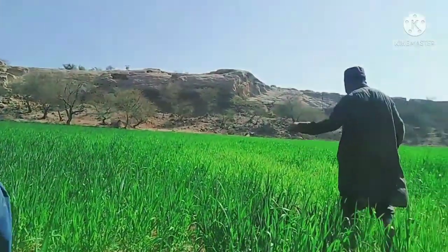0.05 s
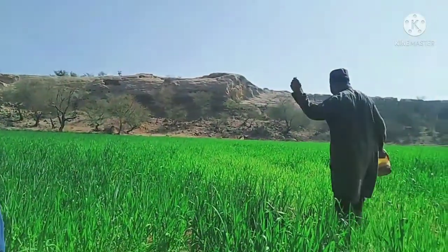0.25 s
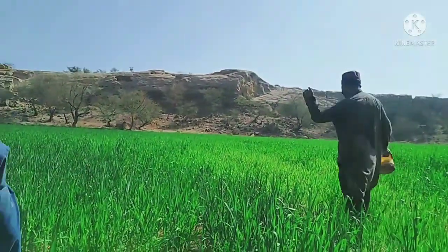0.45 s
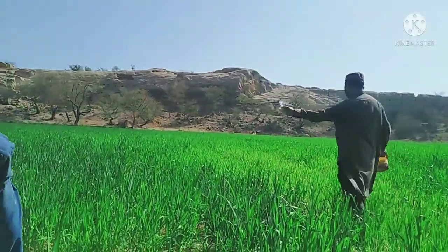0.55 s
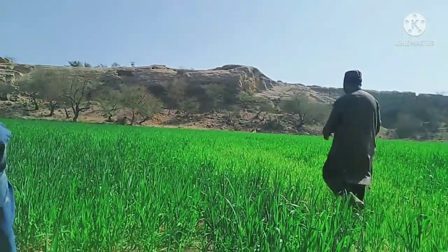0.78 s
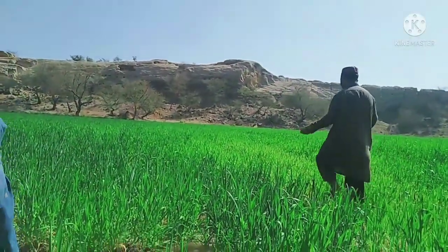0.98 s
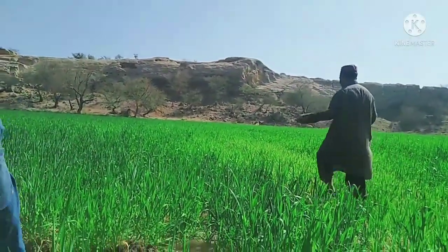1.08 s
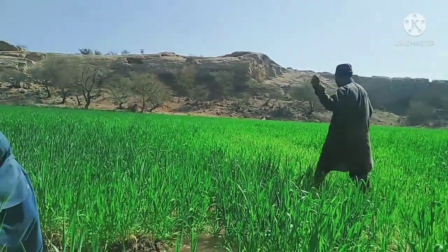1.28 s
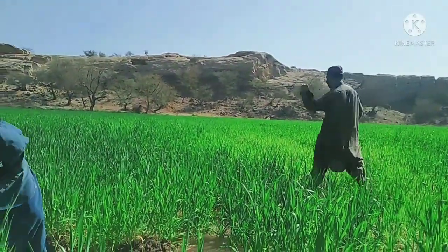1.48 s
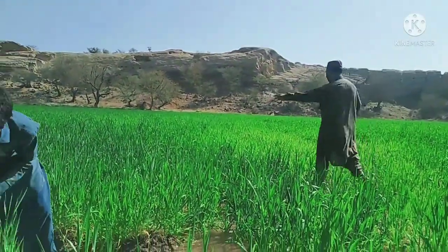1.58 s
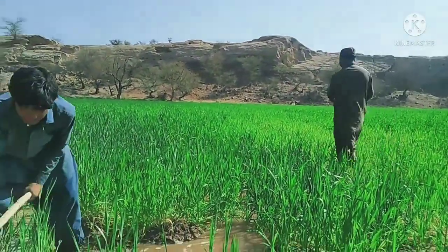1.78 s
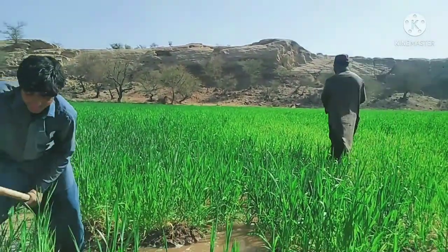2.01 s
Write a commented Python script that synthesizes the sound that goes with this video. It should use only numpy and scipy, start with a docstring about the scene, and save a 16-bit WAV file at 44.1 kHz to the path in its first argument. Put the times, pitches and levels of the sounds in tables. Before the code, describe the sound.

A hoe chops twice into wet mud, outdoors with no echo. At 0.2 seconds the blade cracks sharply on stone with a short knock, then sucks softly free between 0.4 and 0.6 seconds. At about 1.35 seconds the second blow sinks in with a deep, dull thud. Drops patter and small clods slap the wet ground until about 1.9 seconds. A faint hiss and low rumble of air continue throughout.

```python
"""A faint hiss swells and fades over a low wash and a rumble of air, by a flooded channel in a field.
A hoe chops twice into wet mud: the first impact cracks on stone and grit and excites the modes of
blade and handle; the second sinks in, and the mud pocket resonates with a deep thud. Between the blows
the blade sucks free by stick-slip friction and bubbles ring. Drops tick and faint bands of noise swell
far off; after the second blow spray patters down and clods slap the wet ground."""
import sys
import numpy as np
from scipy import signal
from scipy.fft import rfft, irfft
from scipy.io import wavfile
from scipy.ndimage import uniform_filter1d

SR = 44100
rng = np.random.default_rng(int(sys.argv[2]) if len(sys.argv) > 2 else 0)


def int16_out(signal):
    """Quantize to a 16-bit WAV file."""
    q = np.round(np.clip(np.atleast_2d(signal).T, -1, 1) * 32767)
    wavfile.write(sys.argv[1], SR, q.astype(np.int16))


N = 90404
EVENT_T = np.arange(SR // 2) / SR  # time axis of one event [s]

# envelope of the high hiss (time [s], level [dB])
HISS_ENVELOPE = [(0, -53), (.14, -60.5), (.25, -51.5), (.32, -68), (.44, -53.5), (.54, -58), (.68, -59.5),
                 (.79, -53.5), (.97, -52.5), (1.14, -59.5), (1.31, -67.5), (1.39, -50), (1.52, -54.5),
                 (1.65, -54), (1.73, -57), (1.83, -50.5), (2.05, -57)]
# spectrum of the hiss (frequency [Hz], gain [dB])
HISS_SPECTRUM = [(30, -40.5), (500, -12.5), (1500, -9), (2500, -6.5), (4500, -2.5), (8000, -0.5),
                 (12000, -1), (16000, -1)]
# envelope of the low wash of water and soil (time [s], level [dB])
WASH_ENVELOPE = [(0, -49.5), (.17, -56), (.33, -61.5), (.5, -56), (.7, -52), (1.0, -57.5), (1.17, -54),
                 (1.31, -62.5), (1.38, -41), (1.49, -46.5), (1.62, -46.5), (1.74, -51.5), (1.85, -54),
                 (2.05, -61.5)]
# spectrum of the wash (frequency [Hz], gain [dB])
WASH_SPECTRUM = [(30, -2), (150, 0.5), (330, -6), (600, -2), (1100, -5.5), (1800, -5), (3000, -13),
                 (6000, -23.5), (16000, -23.5)]
# spectrum of moving air (frequency [Hz], gain [dB])
AIR_SPECTRUM = [(10, -31.5), (30, -44), (60, -53.5), (120, -58), (300, -72), (1000, -73.5), (16000, -100)]
# drops, wet smacks and snapping stalks
# (time [s], level [dB], centre [Hz], half-width [octaves], decay [s])
TICK_EVENTS = [(0.1875, -17.5, 11000, 0.37, 0.0017), (0.665, -29, 2450, 0.8, 0.0052),
               (.9060, -21.5, 6460, 0.36, 0.0015), (1.3804, -15, 7040, 0.33, 0.0012),
               (1.4187, -7.5, 7000, 0.31, 0.00087), (1.4478, -6, 8000, 0.11, 0.0014),
               (1.5721, -16, 4850, 0.33, 0.0011), (1.6029, -18, 7350, 0.63, 0.00054),
               (1.683, -14, 1400, 0.56, .0006), (1.6834, -15.5, 6900, 0.52, 0.00027),
               (1.7034, -13.5, 7440, 0.17, 0.00043), (1.8617, -14.5, 4150, 0.2, 0.00094)]
# impacts of the hoe (time [s], rise [s], hoe ring [dB], mud thud [dB], stone crack [dB], grit [dB],
# grit hold [s], grit decay [s], squelch [dB], squelch hold [s])
HOE_BLOWS = [(0.2079, 0.0026, -2, -16, -7, -23, 0.00037, 0.0035, -23.5, 0.0096),
             (1.3487, 0.0014, -19, 0.5, -35, -18, 0.0055, 0.0041, -22.5, 0.012)]
# modes of the blade and wooden handle (frequency [Hz], level [dB], t60 [s])
HOE_MODES = [(200.6, -35, 0.26), (354.7, -24.5, 0.065), (445, -31, 0.081), (652, -25, 0.072),
             (1120, -34.5, 0.084), (1226, -24.5, 0.046), (1610, -27.5, 0.043), (1793, -23.5, 0.024),
             (1980, -27.5, 0.027), (3060, -22.5, 0.022), (3905, -19, 0.022), (7360, -19.5, 0.021),
             (8430, -21.5, 0.022)]
# modes of the mud pocket that the blade opens (frequency [Hz], level [dB], t60 [s])
POCKET_MODES = [(179, -19.5, 0.073), (283.4, -13.5, 0.04), (354.5, -25.5, 0.091), (666, -17.5, 0.033),
                (1072, -26.5, 0.032), (2930, -23, 0.032)]
# spectrum of scraped grit (frequency [Hz], gain [dB])
GRIT_SPECTRUM = [(30, 13), (500, -3), (1800, -2.5), (2600, -7), (3900, -0.5), (5300, -3.5), (8000, 2.5),
                 (11000, -20.5), (15000, -5.5)]
# spectrum of squeezed mud (frequency [Hz], gain [dB])
SQUELCH_SPECTRUM = [(30, -30.5), (90, 5), (250, -9.5), (600, 7), (1200, -1), (2200, -2), (4000, -17),
                    (8000, -10.5), (16000, -8)]
# spectrum of the blade cracking on stone (frequency [Hz], gain [dB])
CRACK_SPECTRUM = [(30, -34), (700, -27.5), (1900, -5.5), (2700, -15.5), (3900, -6), (5300, -17), (8400, -5),
                  (11000, -11), (14500, 1)]
# drags of the blade out of the mud
# (time [s], rise [s], hold [s], decay [s], body [dB], wet treble [dB], suck [dB])
BLADE_PULLS = [(0.416, 0.0036, 0.0068, 0.014, -40.5, -48, -50),
               (0.454, 0.00068, 0.018, 0.013, -48, -47.5, -52),
               (0.573, 0.021, 0.02, 0.027, -49.5, -48.5, -61.5)]
# spectrum of the dull pat of mud (frequency [Hz], gain [dB])
PAT_SPECTRUM = [(30, -13), (90, 8.5), (170, 6.5), (400, 8), (1200, 3.5), (2200, -4.5), (4000, -45),
                (8000, -1), (16000, -35)]
# spectrum of the wet crackle of mud (frequency [Hz], gain [dB])
WET_SPECTRUM = [(30, -31), (500, -28), (1500, -1), (3500, -3), (8000, 0), (12000, -9), (16000, 0)]
# resonances of hollows in moving mud (frequency [Hz], bandwidth [Hz], gain [dB])
HOLLOW_MODES = [(430, 32, 3.5), (760, 98, -2.5), (1140, 74, 3), (1600, 39, -16), (2144, 40, 0),
                (2367, 78, -3.5), (3250, 160, -3.5), (3940, 110, -11)]
# mode of the freed handle (frequency [Hz], level [dB], t60 [s])
HANDLE_MODES = [(205, -59.5, 1.4)]
# bubbles in the mud and the channel (time [s], starting frequency [Hz], level [dB], decay [s])
BUBBLE_EVENTS = [(0.587, 133.6, -53, 0.024), (0.6936, 1650, -42, 0.0012)]
# faint bands of noise (time [s], duration [s], centre [Hz], bandwidth [Hz], level [dB])
SWELL_BANDS = [(0.601, 0.68, 549, 65, -73.5), (0.639, 0.59, 2570, 1240, -65.5),
               (1.057, 0.17, 1770, 300, -67), (1.433, 0.18, 1800, 160, -68)]
# envelope of the falling spray (time [s], level [dB])
SPRAY_ENVELOPE = [(1.36, -49.5), (1.5, -56.5), (1.68, -56), (1.72, -72)]
# spectrum of its droplets (frequency [Hz], gain [dB])
DROPLET_SPECTRUM = [(30, -48), (4000, -22), (6500, 3.5), (8000, 5.5), (9500, -10), (16000, -20)]
# lumps of mud landing (time [s], rise [s], hold [s], decay [s], body [dB], wet treble [dB], plop [dB])
CLOD_LANDINGS = [(1.377, 0.0035, 0.00092, 0.0064, -54, -44.5, -42),
                 (1.4173, 0.00021, 0.0035, 0.0049, -38, -31.5, -38),
                 (1.4462, 0.00033, 0.0035, 0.0055, -39.5, -35, -39),
                 (1.642, 0.017, 0.017, 0.0087, -48.5, -49, -54),
                 (1.7026, 0.00044, .002, 0.0058, -40.5, -52, -47.5),
                 (1.783, 0.011, 0.0023, 0.01, -53, -53, -47)]
# modes of the wet ground under a lump (frequency [Hz], level [dB], t60 [s])
GROUND_MODES = [(169, -2.5, 0.075), (383, -2.5, 0.075), (611, -7.5, 0.12), (1023, -10.5, 0.09)]
# response of the microphone (frequency [Hz], gain [dB])
MIC_RESPONSE = [(20, 0.5), (2000, 0), (3800, -3.5), (4700, -6), (6200, -7), (7300, 0), (8400, 2),
                (9300, -4.5), (11000, -7.5), (13000, -6), (14300, -1.5), (15400, -0.5)]


def amp(db):
    """The decibel scale: 20 dB is a factor of ten in amplitude."""
    return 10 ** (np.asarray(db) / 20)


def colour(x, spectrum):
    """Minimum-phase filtering: the Hilbert transform of the log gain supplies a causal phase."""
    hz, db = np.transpose(spectrum)
    f = abs(np.fft.fftfreq(4096, 1 / SR))
    log_gain = np.log(amp(np.interp(np.log(f + 1), np.log(hz), db)))
    response = np.exp(np.conj(signal.hilbert(log_gain)))
    taps = np.fft.ifft(response).real
    return signal.fftconvolve(x, taps[:len(taps) // 2])[:len(x)]


def add(mix, start, sound):
    """Superposition: a sound sums into the mix from its start time [s]."""
    part = mix[max(round(start * SR), 0):][:len(sound)]
    part += sound[:len(part)]


def drift(count, span):
    """A moving average over `span` samples turns white noise into a fluctuation of unit variance."""
    return uniform_filter1d(rng.standard_normal(count), span) * np.sqrt(span)


def grains(count, clump_db):
    """Random amplitude modulation gathers noise into tiny clumps, at unit variance overall."""
    clumps = drift(count, span=16)
    x = rng.standard_normal(count) * amp(clump_db * clumps)
    return x / x.std()


def burst(rise, hold, decay):
    """Gritty noise, evened out by its running RMS, rises, holds and decays exponentially."""
    t = EVENT_T
    grit = grains(len(t), clump_db=7)
    rms = np.sqrt(abs(uniform_filter1d(grit ** 2, round(SR / 900))))  # over about 1.1 ms
    return grit / rms * np.minimum(t / rise, 1) * np.exp(-np.maximum(t - rise - hold, 0) / decay)


def ring(modes, rise):
    """Free vibration is a sum of damped modes, each falling 60 dB in its t60."""
    t = EVENT_T
    x = sum(amp(db) * np.exp(-np.log(1000) * t / t60) * np.sin(2 * np.pi * hz * t)
            for hz, db, t60 in modes)
    return x * np.minimum(t / rise, 1)


def patchy(x, span=9, depth_db=2):
    """Time-frequency modulation: small patches of the spectrum drift in level."""
    spectra = signal.stft(x, nperseg=256)[2]
    field = rng.standard_normal(spectra.shape)
    field = uniform_filter1d(uniform_filter1d(field, span, axis=0), span, axis=1)
    return signal.istft(spectra * amp(depth_db * field / field.std()))[1][:N]


def hiss_wash_and_air():
    """Broadband noise: a hiss and a wash follow slow envelopes over a steady rumble of air."""
    t = np.arange(N) / SR
    hiss_gain = amp(np.interp(t, *np.transpose(HISS_ENVELOPE)))
    wash_gain = amp(np.interp(t, *np.transpose(WASH_ENVELOPE)))
    hiss = hiss_gain * colour(grains(N, clump_db=3), HISS_SPECTRUM)
    wash = wash_gain * colour(grains(N, clump_db=3), WASH_SPECTRUM)
    return patchy(hiss + wash) + colour(rng.standard_normal(N), AIR_SPECTRUM)


def ticks(crackle_db=-15.5):
    """Impulse response: each drop, smack or snapping stalk excites one band, with a trace of crackle."""
    out, hz = np.zeros(N), np.geomspace(100, SR / 2, 60)
    impulse = EVENT_T == 0
    for start, db, centre_hz, half_width, decay in TICK_EVENTS:
        band_db = -10 * np.log10(1 + (np.log2(hz / centre_hz) / half_width) ** 4)
        snap = impulse + amp(crackle_db) * burst(rise=0.00011, hold=0, decay=decay)
        add(out, start, amp(db) * colour(snap, np.c_[hz, band_db]))
    return out


def hoe_blows(spray_db=-33.5, crack_delay_s=0.0005):
    """Impact excites the modes of hoe and mud pocket; stone, grit, spray and squelch add noise bursts."""
    out = np.zeros(N)
    for (start, rise, ring_db, thud_db, crack_db,
         grit_db, grit_hold, grit_decay, squelch_db, squelch_hold) in HOE_BLOWS:
        grit = amp(grit_db) * burst(rise, grit_hold, grit_decay)
        spray = amp(spray_db) * burst(rise, hold=0, decay=0.013)
        squelch = amp(squelch_db) * burst(rise, squelch_hold, decay=0.0059)
        noise = colour(grit + spray, GRIT_SPECTRUM) + colour(squelch, SQUELCH_SPECTRUM)
        hoe = amp(ring_db) * ring(HOE_MODES, rise=0.00024)
        thud = amp(thud_db) * ring(POCKET_MODES, rise=0.0039)
        add(out, start, noise + hoe - thud)  # the thud has opposite polarity
        crack = colour(burst(rise=0.0003, hold=0.0008, decay=0.0009), CRACK_SPECTRUM)
        add(out, start + crack_delay_s, amp(crack_db) * crack)
    return out


def splat(rise, hold, decay, body_db, wet_db):
    """Moving mud radiates transient noise: a dull pat and a wet crackle."""
    pat = amp(body_db) * colour(burst(rise, hold, decay), PAT_SPECTRUM)
    crackle = amp(wet_db) * colour(burst(rise, hold, decay), WET_SPECTRUM)
    return pat + crackle


def suck(rise, hold, decay, unevenness_db=4.5):
    """Stick-slip friction drives the cavity resonances of hollows in the mud."""
    t = EVENT_T
    hollows = sum(amp(db) * width * np.exp(-np.pi * width * t) * np.cos(2 * np.pi * hz * t)
                  for hz, width, db in HOLLOW_MODES)
    slips = burst(rise, hold, decay) * amp(unevenness_db * drift(len(t), span=130))
    return signal.fftconvolve(slips, hollows / np.linalg.norm(hollows))[:len(t)]


def blade_pulls():
    """Suction gives way as the blade leaves the mud, and the handle hums on in free vibration."""
    out = np.zeros(N)
    for start, rise, hold, decay, body_db, wet_db, suck_db in BLADE_PULLS:
        mud = splat(rise, hold, decay, body_db, wet_db)
        add(out, start, mud + amp(suck_db) * suck(rise, hold, decay))
    first_pull = BLADE_PULLS[0][0]
    add(out, first_pull, ring(HANDLE_MODES, rise=0.067))
    return out


def bubbles(rise_s=0.0015, glide_per_s=11.6):
    """Each bubble is a damped oscillator whose frequency rises linearly."""
    out, t = np.zeros(N), EVENT_T
    for start, hz, db, decay in BUBBLE_EVENTS:
        envelope = np.minimum(t / rise_s, 1) * np.exp(-np.maximum(t - rise_s, 0) / decay)
        phase = 2 * np.pi * hz * t * (1 + glide_per_s * t / 2)
        add(out, start, amp(db) * envelope * np.sin(phase))
    return out


def far_swells(waver_db=3):
    """Band-pass noise comes and goes faintly under a wavering half-sine envelope."""
    out, f = np.zeros(N), np.fft.rfftfreq(N, 1 / SR)
    for start, duration, hz, width_hz, db in SWELL_BANDS:
        response = 1 / (1 + (2 * (f - hz) / width_hz) ** 2)
        band = irfft(rfft(rng.standard_normal(N)) * response, N)
        arch = np.sin(np.pi * np.arange(0, duration, 1 / SR) / duration)
        gain = amp(db + waver_db * drift(len(arch), span=1500))
        add(out, start, gain * arch * band[:len(arch)] / band.std())
    return out


def falling_spray():
    """Many tiny impacts merge into noise as spray from the second blow falls through the grass."""
    level_db = np.interp(np.arange(N) / SR, *np.transpose(SPRAY_ENVELOPE), left=-np.inf, right=-np.inf)
    return colour(grains(N, clump_db=4.5) * amp(level_db), DROPLET_SPECTRUM)


def falling_clods(suck_offset_db=-12.5):
    """Inelastic impact: each lump splats, rings the wet ground and sounds hollows closing under it."""
    out = np.zeros(N)
    for start, rise, hold, decay, body_db, wet_db, plop_db in CLOD_LANDINGS:
        plop = amp(plop_db) * ring(GROUND_MODES, rise + hold)
        hollows = amp(wet_db + suck_offset_db) * suck(rise, hold, decay)
        add(out, start, splat(rise, hold, decay, body_db, wet_db) + plop + hollows)
    return out


def scene():
    """Free field: the sources sum to one channel in open air, without reverberation."""
    digging = hoe_blows() + blade_pulls() + falling_clods()
    small_sounds = ticks() + falling_spray() + bubbles()
    return (digging + small_sounds + hiss_wash_and_air() + far_swells())[None]


def record(dry, cutoff_hz=15560):
    """Linear filtering: the microphone's response colours the sound and a low-pass limits its band."""
    low_pass = signal.firwin(511, cutoff_hz, window=("kaiser", 9), fs=SR)
    return signal.fftconvolve(colour(dry[0], MIC_RESPONSE), low_pass, "same")[None]


dry = scene()
out = record(dry)
int16_out(out)
```